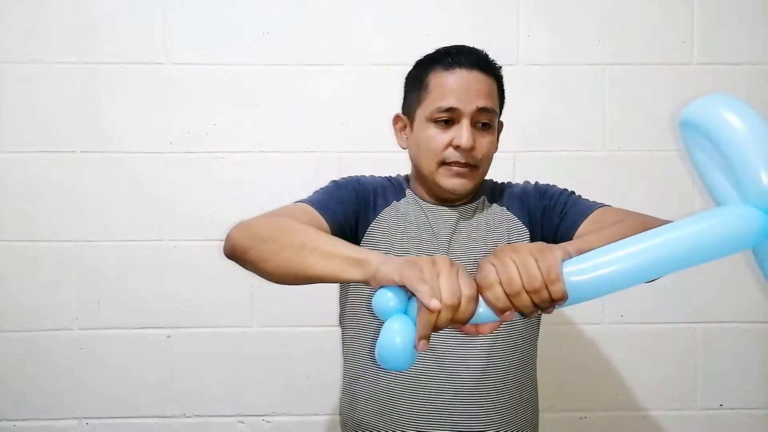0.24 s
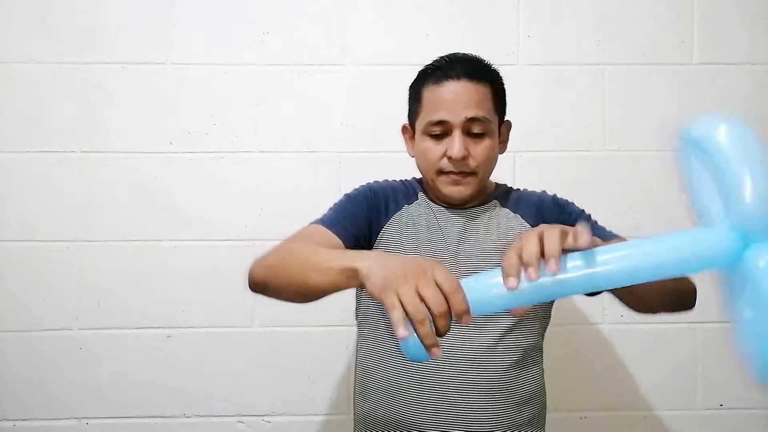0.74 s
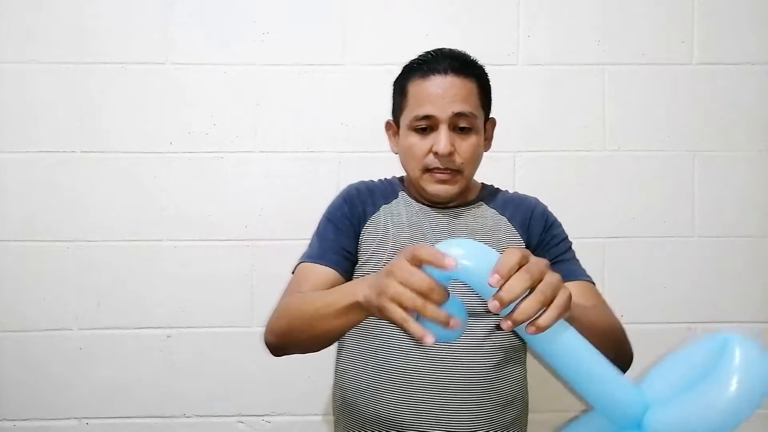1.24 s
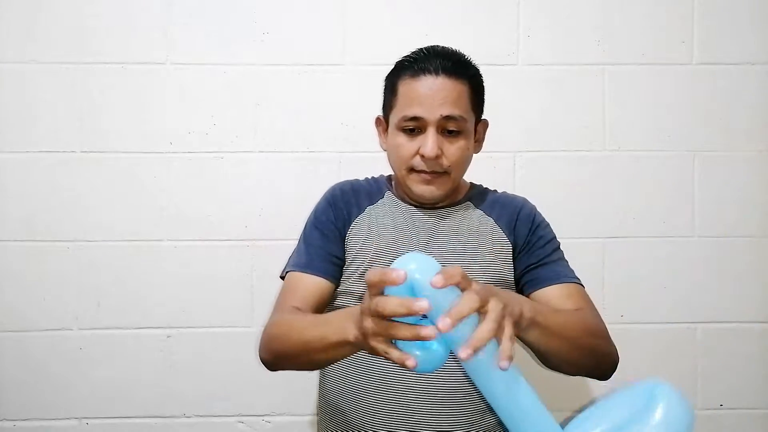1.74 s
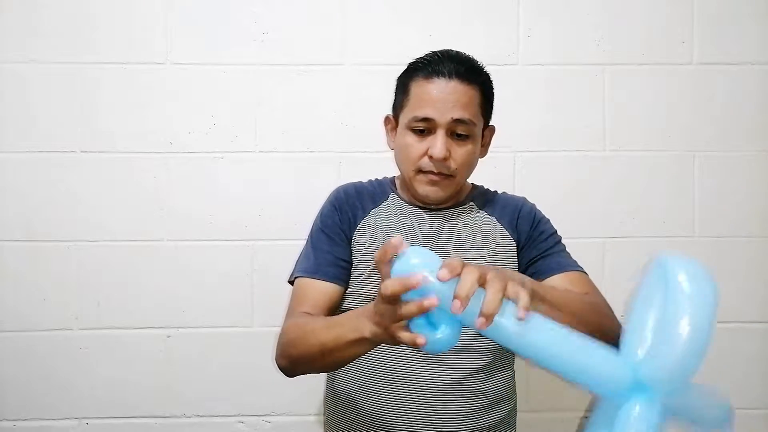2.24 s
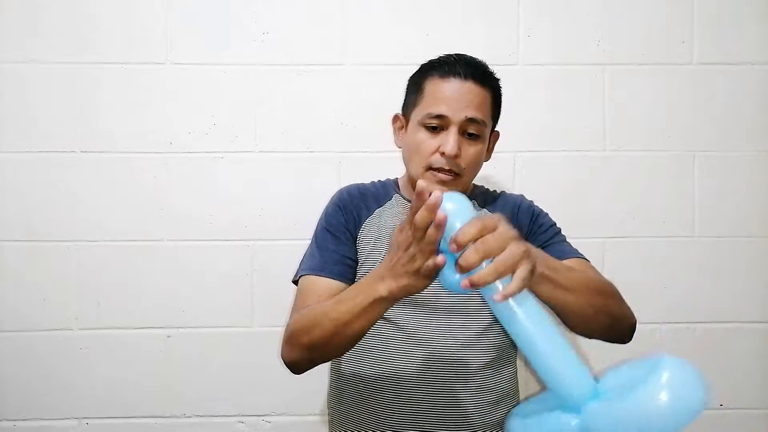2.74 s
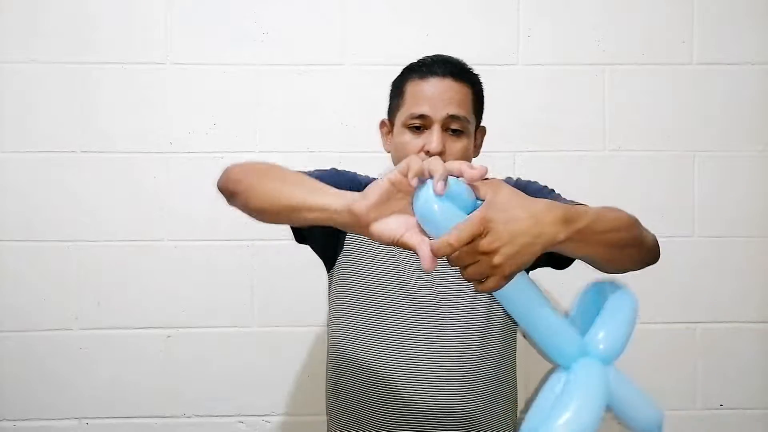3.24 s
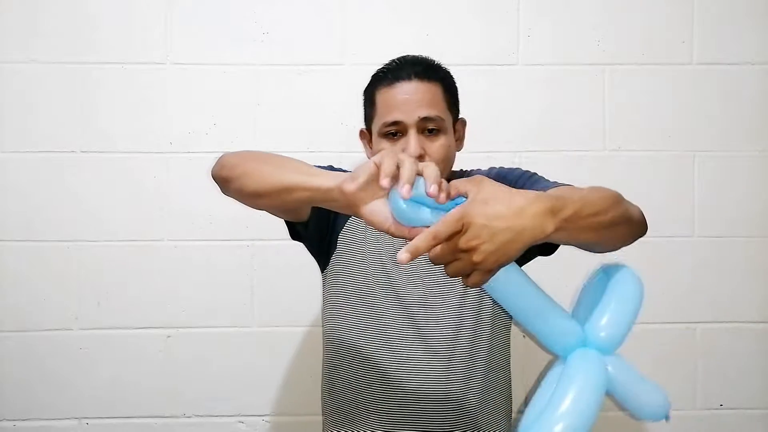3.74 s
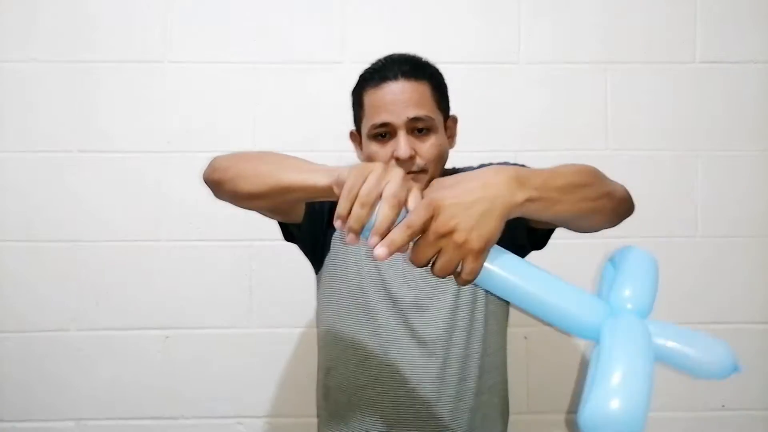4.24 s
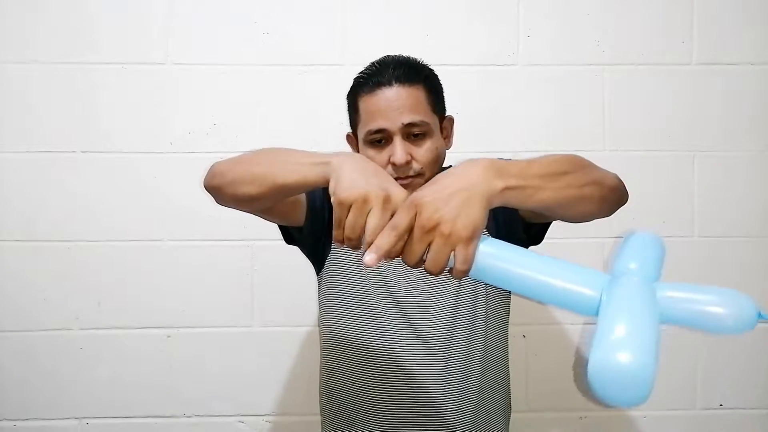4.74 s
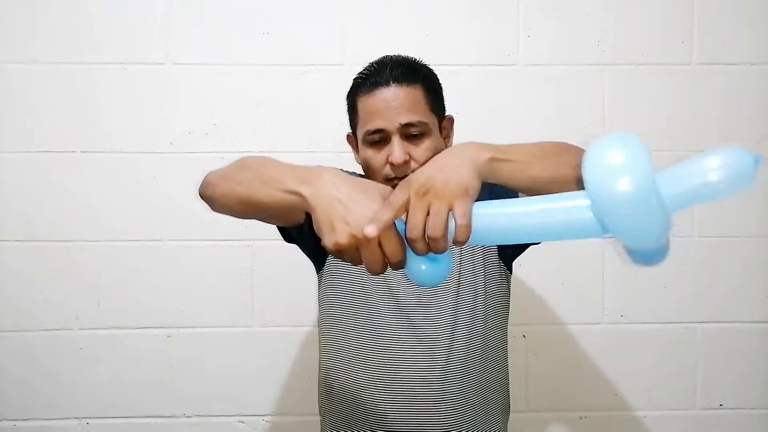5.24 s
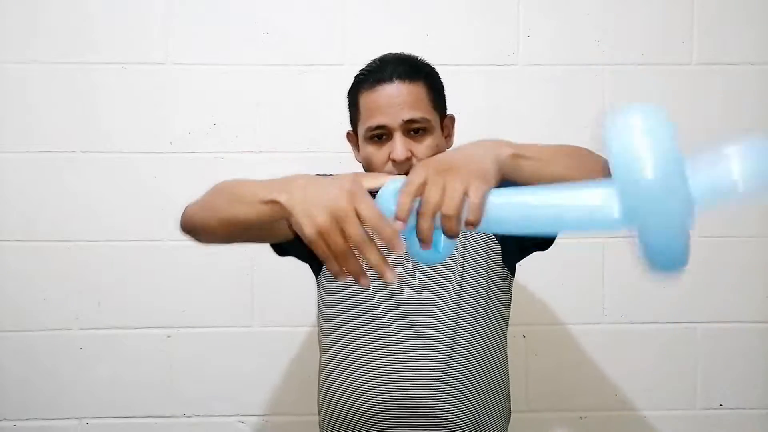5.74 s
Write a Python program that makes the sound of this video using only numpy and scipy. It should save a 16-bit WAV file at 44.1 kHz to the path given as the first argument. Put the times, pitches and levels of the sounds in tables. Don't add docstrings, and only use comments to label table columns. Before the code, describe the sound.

Hands twist a long balloon in a small hard room, with snapping pops, rubbery rubs and short squeaky creaks over faint traffic.

```python
import sys
import numpy as np
from scipy import signal
from scipy.fft import rfft, irfft, next_fast_len
from scipy.io import wavfile
from scipy.ndimage import uniform_filter1d, map_coordinates

SR = 44100
rng = np.random.default_rng(int(sys.argv[2]) if len(sys.argv) > 2 else 0)


def to_wav(sig):
    pcm = np.clip(np.atleast_2d(sig), -1, 1) * 32767
    pcm = np.round(pcm).astype(np.int16)
    wavfile.write(sys.argv[1], SR, pcm.T)


def to_linear_factor(level_db):
    exponent = np.asarray(level_db, float) / 20
    return 10 ** exponent


N = 263718

SHADOW = 0.29


def unit(x):
    return x / np.sqrt(np.mean(x ** 2) + 1e-20)


def along(points, hz):
    f, v = np.transpose(points)
    return np.interp(np.log(hz + 1), np.log(f + 1), v)


def coloured(x, points):
    size = 2 * next_fast_len(x.shape[-1] // 2 + 4096)
    log_gain = np.log(to_linear_factor(along(points, np.fft.rfftfreq(size, 1 / SR))))
    cepstrum = irfft(log_gain, size)
    cepstrum[1:size // 2] *= 2
    cepstrum[size // 2 + 1:] = 0
    return irfft(rfft(x, size) * np.exp(rfft(cepstrum)), size)[..., :x.shape[-1]]


def diffuse(size):
    # pitch_hz, likeness (0-1)
    likeness = [(25, 0.89), (70, 0.18), (150, 0.73), (250, 0.759), (600, 0.32), (1300, 0.0333),
                (3000, 0.09)]
    turn = np.arccos(np.clip(along(likeness, np.fft.rfftfreq(size, 1 / SR)), 0, 1)) / 2
    mid, side = irfft(rfft(rng.standard_normal((2, size))) * [np.cos(turn), np.sin(turn)], size)
    return np.array([mid + side, mid - side])


def wobble(rate):
    knots = rng.standard_normal(int(N * rate / SR) + 4)
    return map_coordinates(knots, [np.arange(N) * rate / SR])


def side_db(s):
    # time_s, left_right_db
    place = [
        (0, -0.5),
        (1.3, 0.1),
        (2.0, 0.9),
        (2.6, 3),
        (3.3, 2.5),
        (3.45, -2),
        (4.5, -5.5),
        (5.0, -3.5),
        (5.98, -3),
    ]
    return np.interp(s, *np.transpose(place))


def placed(s, waves, pan_db):
    where = (np.round(s * SR).astype(int) + np.arange(waves.shape[1])).ravel()
    ears = [(waves * to_linear_factor(side * pan_db / 2)).ravel() for side in (1, -1)]
    return np.array([np.bincount(where, ear, N + SR)[:N] for ear in ears])


def traffic(loud, knee_db, duck):
    # pitch_hz, level_db (per Hz)
    rumble_colour = [(12, -9), (20, -10), (28, 3.5), (42, -2.5), (70, -4.5), (150, -11.5), (400, -43.5)]
    # time_s, length_s, rumble_db, drone_db, drone_hz
    passes = [
        (0.15, 0.44, -67, -64, 106),
        (1.111, 0.48, -65, -58, 140),
        (1.784, 0.29, -69, -59.5, 112),
        (3.794, 0.35, -64, -59, 169),
        (4.8, 0.36, -59.5, -62, 111),
        (5.125, 0.149, -78, -61, 181),
        (5.9, 0.51, -55.5, -50.5, 181),
    ]
    t = np.arange(N) / SR
    s, length, rumble_db, drone_db, drone_hz = np.transpose(passes)[..., None]
    near = np.exp(-((t - s) / length) ** 2)
    rumble_level = to_linear_factor(-70) + np.sum(near * to_linear_factor(rumble_db), 0)
    lumps = to_linear_factor(3.7 * wobble(2.943))
    rumble = unit(lumps * coloured(diffuse(N), rumble_colour)) * to_linear_factor(11.5) * rumble_level
    turn = 2 * np.pi * drone_hz * t
    sway = [wobble(46) for _ in range(4)]
    cos = np.sum(near * to_linear_factor(drone_db) * np.cos(turn), 0)
    sin = np.sum(near * to_linear_factor(drone_db) * np.sin(turn), 0)
    drone = sway[0] * cos + sway[1] * sin + 0.55 * np.array([sway[2], sway[3]]) * cos
    power = uniform_filter1d(np.mean(loud ** 2, 0), size=SR // 5, origin=SR // 14)
    level_db = 10 * np.log10(np.abs(power) + 1e-12)
    return (rumble + drone) * to_linear_factor(-duck * np.maximum(level_db - knee_db, 0))


def microphone_hiss():
    # pitch_hz, level_db (per Hz)
    hiss_colour = [(100, -12), (200, 3), (500, -4), (1000, -8), (3000, -20), (8000, -17.5), (16000, -20.5)]
    drop_db, drop_s, slide_s = 4.5, 2.1, 0.05
    t = np.arange(N) / SR
    hiss_db = -57.5 - drop_db * (1 + np.tanh((t - drop_s) / slide_s)) / 2
    return unit(coloured(diffuse(N), hiss_colour)) * to_linear_factor(hiss_db + 0.84 * wobble(27.0))


def room_tone(loud):
    follows = 0.83
    lean_db = np.array([[1], [-1]]) * follows * side_db(np.arange(N) / SR) / 2
    return (traffic(loud, knee_db=-56.5, duck=0.36) + microphone_hiss()) * to_linear_factor(lean_db)


def snaps(table, hiss_db, cycles):
    s, db, ring_db, hz = np.transpose(table)
    pan_db = side_db(s)
    return np.array([s, db, ring_db, hiss_db + SHADOW * pan_db, hz, pan_db, cycles + 0 * s]).T


def first_clicks(table, colour, db, grows):
    s, peak_db = np.transpose(table)[:2, :, None]
    return coloured(placed(s, to_linear_factor(db + grows * (peak_db + 23)), side_db(s)), colour)


def strokes(table, uneven, cycles, ring_db, hiss_db, rise_db, size_db):
    rows = []
    fall_db = 31
    uneven = max(uneven, .16)
    for start, rise, fall, peak_db, hz, rate in table:
        chance = rng.standard_normal((200, 3))
        gaps = np.exp(uneven * chance[:, 0] - uneven ** 2 / 2) / rate
        times = start + np.cumsum(gaps)
        db = peak_db - np.interp(times - start, [0, rise, rise + fall], [rise_db, 0, fall_db])
        db = db + size_db * (0.35 + uneven) * chance[:, 1]
        db = db - 10 * np.log10(rate / 200)
        pitch = hz * np.exp(0.32 * uneven * chance[:, 2])
        each = snaps(np.array([times, db, ring_db + 0 * db, pitch]).T, hiss_db, cycles)
        rows.append(each[times < min(start + rise + fall, N / SR)])
    return np.vstack(rows)


def peels():
    # time_s, peak_db, ring_db, pitch_hz
    peel_events = [(0.1422, -56, -17, 255), (0.6842, -54, -39, 320), (0.6983, -51, 0, 1210),
                   (0.7189, -36, -26, 842), (0.7321, -38, -20, 750), (0.9237, -40.5, 0, 860),
                   (1.4203, -28, 2, 796), (1.681, -43, -1, 1010), (1.7997, -56, -16, 570),
                   (1.8402, -44.5, -6, 356), (1.8606, -38, -17, 602), (2.013, -30.5, -47, 1090),
                   (2.0598, -42.5, -2, 1080), (2.0839, -24, -8.5, 813), (2.5384, -56.5, -13, 260),
                   (2.6215, -48, -17, 403), (2.7288, -62.5, 0, 200), (2.9372, -45.5, -28, 938),
                   (3.02, -47, -9, 198), (3.2098, -54, 1.5, 1096), (3.3061, -38.5, -11.5, 851)]
    # pitch_hz, level_db
    tick = [(1500, -22.5), (3500, -3), (6000, 5), (10000, 0.5), (16000, 0)]
    return snaps(peel_events, hiss_db=3, cycles=2.0), first_clicks(peel_events, tick, db=-3.5, grows=1.0)


def rubs():
    # start_s, rise_s, fall_s, peak_db, pitch_hz
    rub_events = [
        (0.56, 0.055, 0.1, -58.5, 346),
        (0.68, 0.12, 0.013, -38.5, 844),
        (0.907, 0.0075, 0.065, -52.5, 800),
        (1.446, 0.0054, 0.072, -35, 845),
        (1.838, .02, 0.029, -58, 430),
        (2.01, 0.027, 0.032, -46, 890),
        (2.94, 0.092, 0.026, -65, 346),
        (3.85, 0.0047, 0.082, -55, 890),
        (4.484, 0.0085, 0.03, -31.5, 925),
        (5.91, 0.021, 0.059, -48, 524),
    ]
    return strokes([(*rub, 210) for rub in rub_events],
                   uneven=0.7456, cycles=1.65, ring_db=-17, hiss_db=2, rise_db=20, size_db=7.0)


def pops():
    # time_s, peak_db, ring_db, pitch_hz
    pop_events = [(0.594, -44, -10.5, 328), (0.7068, -31, -9, 960), (0.7759, -24.5, -7.5, 950),
                  (0.9063, -29.5, -9, 613), (1.008, -30, -5, 580), (1.1529, -43.5, -30, 610),
                  (1.3123, -48, 0, 1050), (1.3794, -37.5, -1.5, 433), (1.4486, -18.5, -16, 860),
                  (1.4701, -21, -17, 800), (1.714, -38, -4.3, 430), (2.2264, -37.5, -6.5, 543),
                  (2.3603, -47.5, -3.5, 400), (2.9776, -41.5, -1.5, 280.4), (3.8573, -41, -8.5, 914),
                  (3.8871, -49.5, 2.5, 788), (4.4977, -26.5, -28, 1060), (4.5043, -23, -19, 1123),
                  (4.6982, -41, -1, 506), (4.9811, -65, 18, 286), (5.0679, -39, 3, 890),
                  (5.1029, -30, -1.5, 946), (5.1692, -35.5, -2.5, 551), (5.2118, -22.5, -12.5, 313.5),
                  (5.247, -17.5, -13, 284), (5.2743, -38, 0, 1040), (5.5045, -49, -0.5, 1080),
                  (5.5303, -47, -8, 635), (5.658, -31.5, -7, 725), (5.8665, -36.5, -12, 484.4)]
    # pitch_hz, level_db
    knock = [(500, -22), (1000, 2.5), (2500, -3.5), (4000, -5), (9000, -30.5)]
    return snaps(pop_events, hiss_db=-11.5, cycles=1.21), first_clicks(pop_events, knock, db=-7, grows=1.58)


def drags():
    # start_s, rise_s, fall_s, peak_db, pitch_hz
    drag_events = [
        (1.151, 0.013, .12, -47, 666),
        (3.55, 0.027, 0.35, -62.5, 400.7),
        (4.005, 0.0515, 0.0338, -30.5, 807),
        (4.7, .025, 0.048, -42.5, 677),
        (4.869, 0.15, 0.062, -61.5, 400),
        (5.07, 0.0397, .05, -41.5, 760),
        (5.205, 0.018, 0.063, -30, 413),
        (5.243, 0.0048, 0.0556, -24, 1110),
    ]
    return strokes([(*drag, 190) for drag in drag_events],
                   uneven=1.12, cycles=1.75, ring_db=-3, hiss_db=-12, rise_db=24, size_db=-2.0)


def squeaks(drift, throb):
    # start_s, length_s, pitch_hz, level_db, left_right_db
    sung = [(1.381, 0.018, 398, -34.5, -3), (1.707, 0.027, 427, -36.5, -4), (1.803, 0.023, 565, -35.5, 3),
            (2.081, 0.017, 787, -32.5, -3), (2.363, 0.011, 348, -49, 14), (2.986, 0.012, 300, -54, 19),
            (3.306, 0.011, 800, -43, -1), (3.406, 0.16, 430, -38, -8), (3.487, 0.047, 903, -48.5, -6.5),
            (4.014, 0.044, 529, -51, -7), (4.034, 0.016, 1120, -47, -23), (5.17, 0.084, 489, -40, -11),
            (5.205, 0.025, 324.4, -55, 3), (5.24, 0.054, 272, -29.5, -4), (5.522, 0.052, 608.7, -38.5, -4),
            (5.728, 0.033, 532.6, -32, -15), (5.739, 0.038, 177.3, -32, -2.5),
            (5.752, 0.059, 541, -30.5, -24.5), (4.043, 0.033, 410, -43, -11),
            (5.786, 0.017, 340.4, -41, -1), (5.872, 0.045, 249.4, -28, -3), (5.868, 0.04, 503, -27.5, 0),
            (5.862, 0.066, 978, -42, -19)]
    s, length, hz, db, pan_db = np.transpose(sung)[..., None]
    t = np.arange(SR // 8) / SR
    u = np.clip(t / length, 0, 1)
    note = np.arange(len(s))[:, None]
    pitch_sway, level_sway = [map_coordinates(rng.standard_normal((len(s), 20)),
                                              np.broadcast_arrays(note, rate * t)) for rate in (45, 120)]
    phase = 2 * np.pi * np.cumsum(hz * (1 + drift * pitch_sway), axis=1) / SR
    swell = np.sin(np.pi * u ** 0.51)
    return placed(s, to_linear_factor(db + throb * level_sway) * swell * np.sin(phase), pan_db)


def groans():
    # start_s, rise_s, fall_s, peak_db, pitch_hz
    groan_events = [
        (3.4, .09, 0.0953, -46.5, 456.8),
    ]
    return strokes([(*groan, 130) for groan in groan_events],
                   uneven=0.05, cycles=5, ring_db=-3, hiss_db=-32, rise_db=8, size_db=1.5)


def creaks():
    # start_s, rise_s, fall_s, peak_db, pitch_hz
    creak_events = [
        (5.525, 0.01216, 0.034, -34, 620.4),
        (5.655, 0.011, .05, -38.5, 500),
        (5.72, 0.0547, 0.036, -31, 539.5),
        (5.866, 0.0078, 0.096, -34, 501),
    ]
    return strokes([(*creak, creak[-1] / 3) for creak in creak_events],
                   uneven=0.59, cycles=2, ring_db=-7, hiss_db=-14, rise_db=12.5, size_db=5.0)


def slips(rows, gain_db, ring_db, fizz_db, second_db, soft_db, covered):
    # pitch_hz, level_db
    crack_colour = [(400, -46), (900, -5), (1500, -8.5), (2500, 8.5), (3500, 10), (5000, -3.5), (9000, -69)]
    fizz_colour = [(1500, -8.5), (3500, 10), (5000, -4), (9000, 4.5), (13000, 1.5), (16000, 4)]
    # pitch_hz, level_db
    thud_colour = [(300, -81), (700, 4.5), (1200, 11.5), (2000, 10.5), (3300, 2), (4500, -34), (9000, -38)]
    muffle_colour = [(1500, -42), (3500, -4.5), (5000, 0.5), (7500, 0.5), (10000, -8.5), (13000, -12.5),
                     (16000, -33.5)]
    s, db, low_db, high_db, hz, pan_db, cycles = np.transpose(rows)[..., None]
    t = np.arange(800) / SR
    swell = (1 - np.exp(-hz * t / 0.37)) * np.cos(np.pi / 2 * t / t[-1])

    def mode(f):
        return np.sin(2 * np.pi * f * t) * np.exp(-f * t / cycles) * swell

    upper_hz = hz * (1.82 + 0.3 * rng.standard_normal(hz.shape))
    upper_db = second_db - np.maximum(hz - 500, 0) / 45
    ring = (mode(hz) + to_linear_factor(upper_db) * mode(upper_hz)) * to_linear_factor(db + low_db + ring_db)
    sharp = 1 / (2 + np.exp((soft_db - high_db + 0.63 * low_db - covered * pan_db) / 1.17))
    jolt = to_linear_factor(db + gain_db)
    fizz = to_linear_factor(db + gain_db + high_db + fizz_db)
    parts = [(jolt * sharp, crack_colour), (jolt * (1 - sharp), thud_colour),
             (fizz * sharp, fizz_colour), (fizz * (1 - sharp), muffle_colour)]
    noises = sum(coloured(placed(s, size, pan_db), colour) for size, colour in parts)
    return placed(s, ring, pan_db) + noises


def smear(spread_s):
    hz = np.fft.rfftfreq(1024, 1 / SR)
    chance = rng.standard_normal(len(hz)) + 0.523 * rng.standard_normal((2, len(hz)))
    lag = np.abs(uniform_filter1d(chance, size=16, axis=1)) * 4 * spread_s
    lag = lag * np.clip(hz / 1500, 0, 1)
    return irfft(np.exp(-2j * np.pi * np.cumsum(lag, axis=1) * hz[1]))


def room(x, spread_s, bounce_db, wall_db, gap_s, rise_s, clear_db):
    # pitch_hz, t60_s
    decay = [(150, 0.34), (500, 0.33), (1500, 0.28), (4000, 0.3), (10000, 0.29), (16000, 0.18)]
    # pitch_hz, level_db
    returned = [(100, -20), (300, 0.5), (700, 0), (2000, 1.5), (16000, 3.5)]
    floor_bounce = round(.0055 * SR)
    heard, step = np.zeros((2, N + 2 * SR)), SR // 5
    for start in range(0, N, step):
        hz, t, z = signal.stft(diffuse(SR // 2), SR, nperseg=256)
        tail_db = along(returned, hz)[:, None] - 60 * t / along(decay, hz)[:, None]
        tail = signal.istft(z * to_linear_factor(tail_db), SR, nperseg=256)[1]
        tail = tail * np.clip((np.arange(tail.shape[1]) / SR - gap_s) / rise_s, 0, 1)
        path = to_linear_factor(wall_db) * tail / np.linalg.norm(tail, axis=1, keepdims=True)
        direct = smear(spread_s)
        path[:, 0] += to_linear_factor(clear_db)
        path[:, :direct.shape[1]] += direct
        path[:, floor_bounce:floor_bounce + direct.shape[1]] += to_linear_factor(bounce_db) * smear(2 * spread_s)
        answer = signal.fftconvolve(x[:, start:start + step], path, axes=1)
        heard[:, start:start + answer.shape[1]] += answer
    return heard[:, :N]


def scene():
    peel_slips, peel_clicks = peels()
    pop_slips, pop_clicks = pops()
    rows = np.vstack([peel_slips, pop_slips, rubs(), drags(), groans(), creaks()])
    skin = slips(rows, gain_db=18.5, ring_db=11.5, fizz_db=7.0, second_db=0.0, soft_db=-16.5, covered=2.1)
    notes = squeaks(drift=0.02, throb=2.4)
    balloon = room(skin + to_linear_factor(-18.0) * notes, spread_s=.0011, bounce_db=-10.5, wall_db=5.0,
                   gap_s=0.0012, rise_s=0.0031, clear_db=-8.5)
    balloon = balloon + peel_clicks + pop_clicks + to_linear_factor(-4) * notes
    return balloon + room_tone(balloon)


def roll_off(x):
    return signal.sosfilt(signal.butter(12, 16500, fs=SR, output="sos"), x)


def record(dry):
    # pitch_hz, level_db
    left_port = [(100, -8.5), (3000, 2.5), (3900, -6), (5000, -1), (6500, -8), (9000, 1), (11000, -4.5),
                 (13000, -14), (15250, -6.5), (15500, -35), (17000, -47)]
    right_port = [(100, -8), (3000, 4), (3900, -2), (5000, 0), (6500, 2), (9000, -5), (11000, -11.5),
                  (13000, -8.5), (15250, -12), (15500, -31), (17000, -47)]
    ports = np.array([coloured(dry[0], left_port), coloured(dry[1], right_port)])
    return roll_off(ports)


dry = scene()
out = record(dry)
to_wav(out)
```